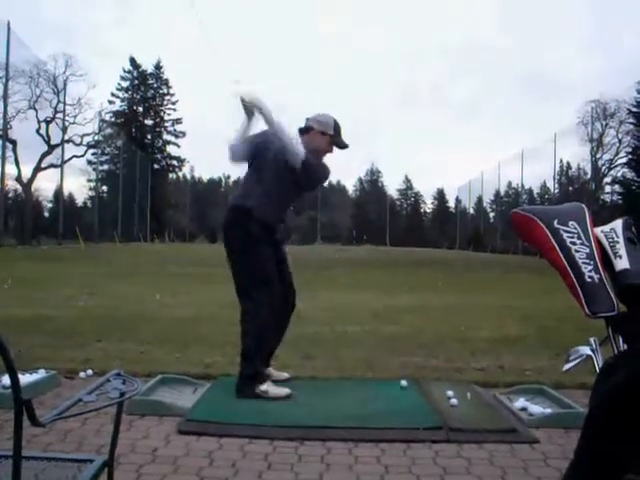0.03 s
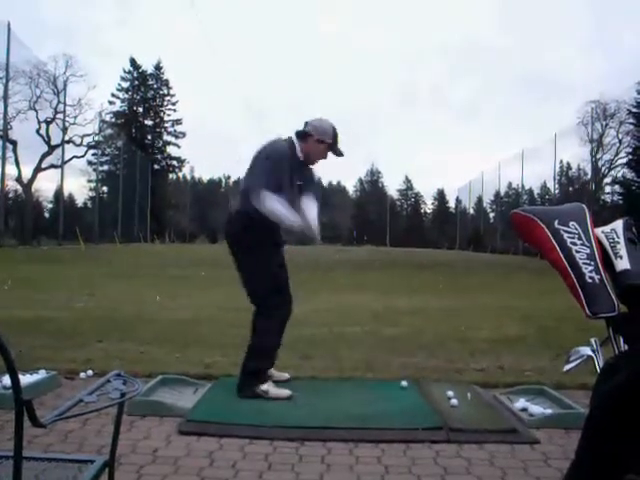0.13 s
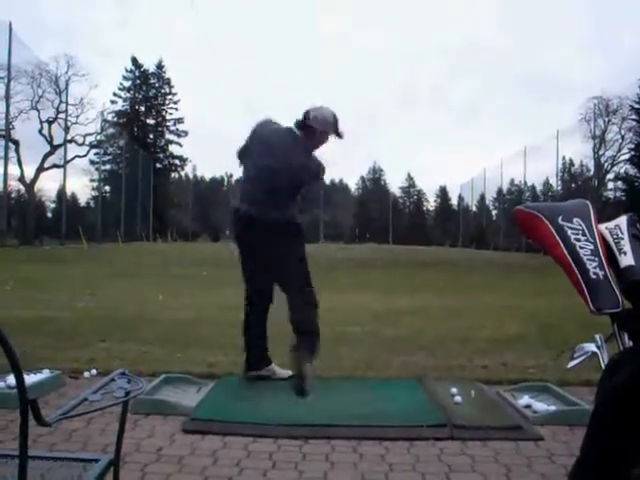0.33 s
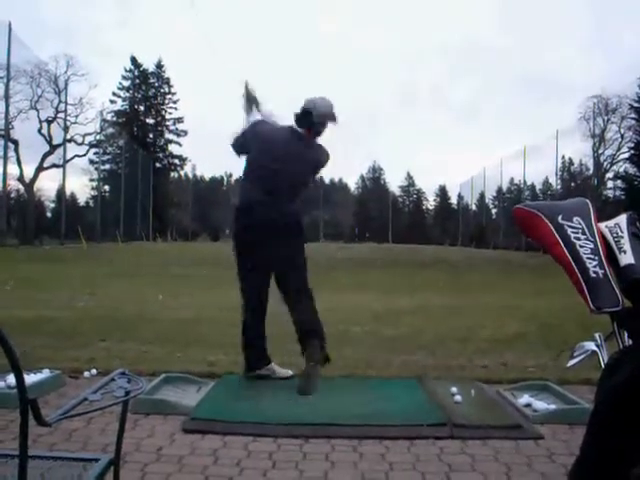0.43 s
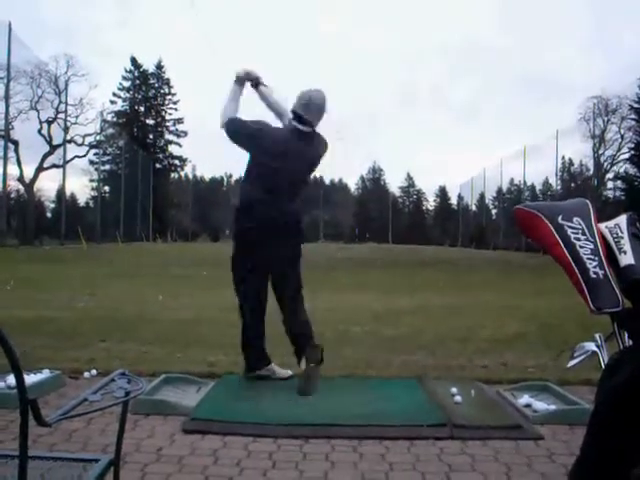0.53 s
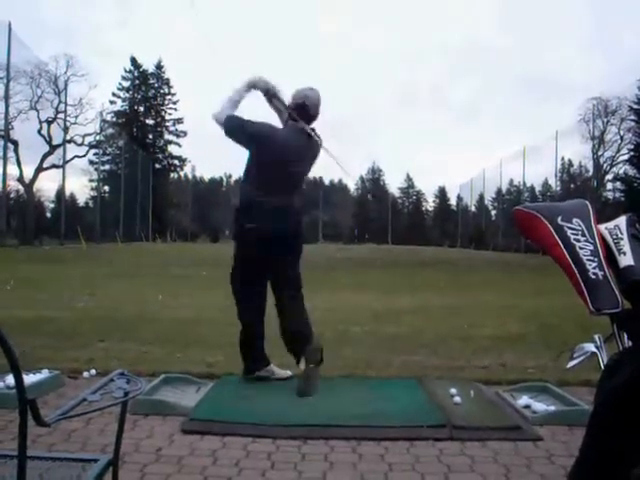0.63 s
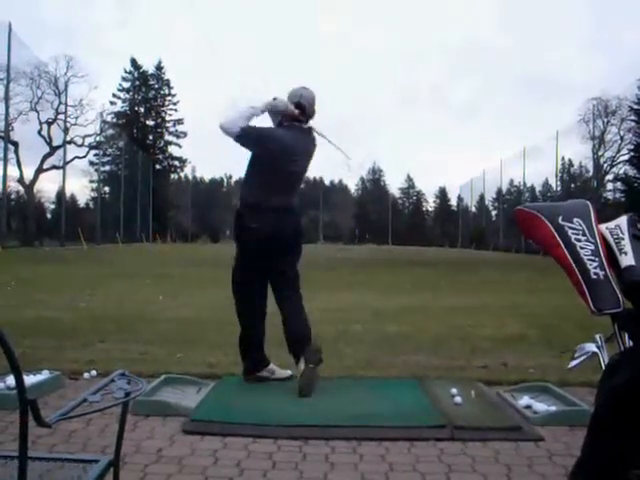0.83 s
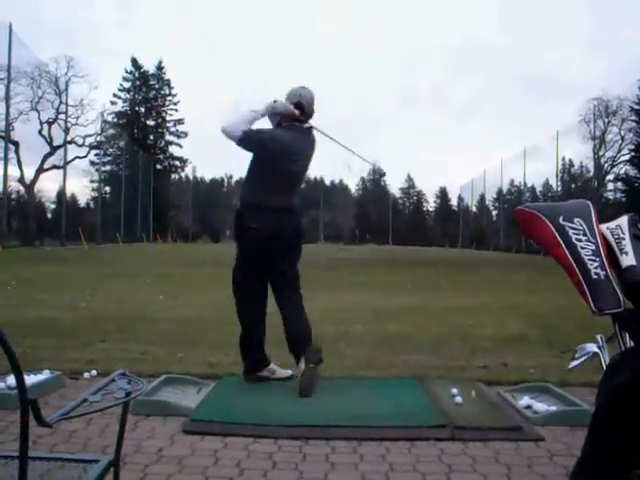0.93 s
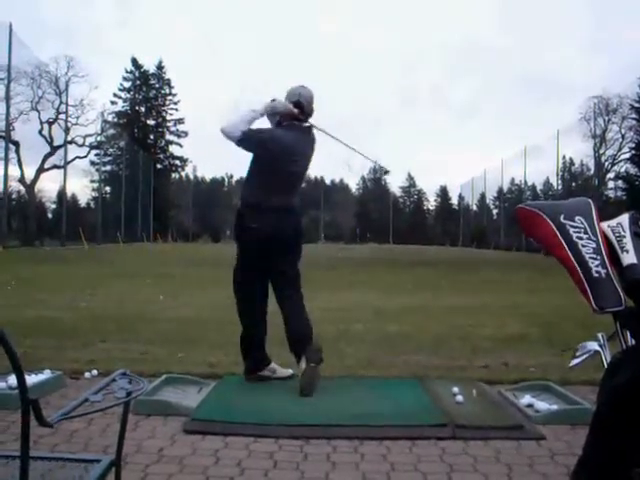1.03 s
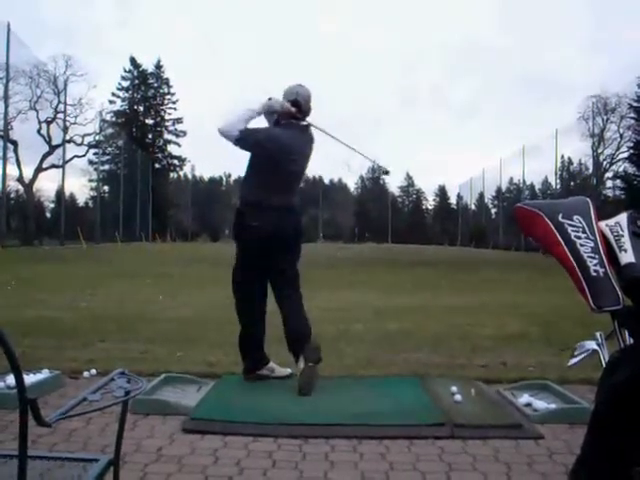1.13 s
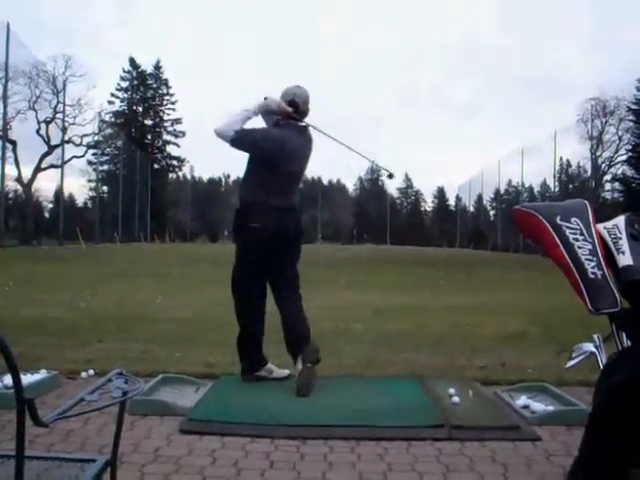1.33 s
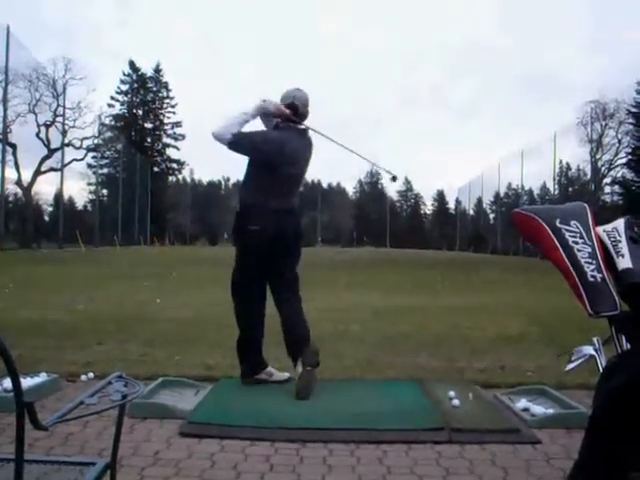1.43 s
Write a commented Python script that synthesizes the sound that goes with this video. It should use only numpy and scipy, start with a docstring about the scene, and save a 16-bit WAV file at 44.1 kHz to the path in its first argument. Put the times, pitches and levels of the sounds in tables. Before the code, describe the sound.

A golf club whistles down at about 0.2 seconds and strikes the ball at 0.25 with a loud, sharp crack that rings briefly and echoes away across the driving range. Soft dull knocks follow around 0.4 and 0.5 seconds. Near 1.3 seconds comes a faint swish, like a distant swing. Quiet outdoor air, low rumble, hiss and a very faint electronic whine continue throughout.

```python
"""A golf club drives a ball off a mat at a driving range. The shaft whistles down, the hollow head cracks
and rings briefly, and the bay throws the crack back. Soft knocks follow, then a faint swish like a swing
in another bay. Under it all: outdoor air, low rumble, hiss and a thin electronic whine."""
import sys
import numpy as np
from scipy import signal
from scipy.fft import rfft, irfft
from scipy.io import wavfile

SR = 44100
rng = np.random.default_rng(int(sys.argv[2]) if len(sys.argv) > 2 else 0)


def waveform_to_disk(signal):
    """Save audio, clipped to [-1, 1], as 16-bit WAV at the path in sys.argv[1]."""
    frames = np.transpose(np.atleast_2d(signal))
    scaled = np.clip(frames, -1, 1) * 32767
    samples = np.round(scaled).astype(np.int16)
    wavfile.write(sys.argv[1], SR, samples)


N = 66150
T = np.arange(N) / SR
IMPACT_S = .2496


def amp(db):
    """Decibels to gain."""
    return 10 ** (np.asarray(db) / 20)


def unit(x):
    """Scale to rms 1."""
    return x / np.sqrt(np.mean(abs(x) ** 2) + 1e-20)


def noise(spectrum):
    """Steady noise, rms 1, shaped by rows of freq_hz, relative density_db."""
    freq_hz, density_db = np.transpose(spectrum)
    bins_hz = np.fft.rfftfreq(N, 1 / SR)
    gain = amp(np.interp(np.log(bins_hz + 1), np.log(freq_hz), density_db))
    return unit(irfft(rfft(rng.standard_normal(N)) * gain, N))


def flutter(width_hz):
    """Slow complex noise, rms 1; spreads a tone into a band."""
    bins_hz = np.fft.fftfreq(N, 1 / SR)
    white = rng.standard_normal(N) + 1j * rng.standard_normal(N)
    return unit(np.fft.ifft(white / (1 + (2 * bins_hz / width_hz) ** 2)))


def tone(pitch_hz, envelope):
    """Steady or gliding tone under a complex envelope."""
    cycles = np.cumsum(pitch_hz * np.ones(N)) / SR
    return np.sqrt(2) * (envelope * np.exp(2j * np.pi * cycles)).real


def burst(start_s, rise_s, t60_s):
    """Envelope: quick rise, exponential decay."""
    age_s = np.maximum(T - start_s, 0)
    return (1 - np.exp(-age_s / rise_s)) * np.exp(-np.log(1000) * age_s / t60_s)


def swell(peak_s, width_s):
    """Gaussian envelope."""
    return np.exp(-((T - peak_s) / width_s) ** 2)


def outdoor_air(air_db=-64, rumble_db=-66):
    """Air swaying slightly in level, over low rumble."""
    # air and rumble spectra: freq_hz, density_db
    air_spectrum = [(30, -18.5), (200, -6), (400, -10.5), (700, -1.5), (1000, 0.5), (1400, -3.5),
                    (2200, -9), (3300, -23), (6000, -34), (16000, -55)]
    rumble_spectrum = [(15, -23), (30, -10.5), (60, -5.5), (88, -0.5), (130, -12), (220, -15), (400, -25),
                       (2000, -76.5)]
    sway_db = flutter(width_hz=8).real
    return amp(air_db + sway_db) * noise(air_spectrum) + amp(rumble_db) * noise(rumble_spectrum)


def downswing(rush_s=.233, rush_db=-42.5, rise_s=.032, fall_s=.03):
    """Vortices off the shaft whistle higher as it speeds up; the head adds a broad rush."""
    # shaft whistle: time_s, pitch_hz, level_db
    whistle_path = [(.13, 480, -82), (.175, 530, -66), (.2, 606.2, -44), (.222, 688, -46.5),
                    (.24, 688.4, -36), (.255, 639, -45.5), (.29, 538, -62), (.33, 453, -83)]
    # air torn by the head: freq_hz, density_db
    rush_spectrum = [(100, -23), (300, 2.5), (1100, -0.5), (1800, -3), (3300, -2), (6000, -13),
                     (10000, -17.5), (16000, -24)]
    time_s, pitch_hz, level_db = np.transpose(whistle_path)
    envelope = amp(np.interp(T, time_s, level_db)) * (T > time_s[0]) * (T < time_s[-1])
    whistle = envelope * tone(np.interp(T, time_s, pitch_hz), flutter(width_hz=150))
    rush = noise(rush_spectrum) * swell(rush_s, np.where(T < rush_s, rise_s, fall_s))
    return whistle + amp(rush_db) * rush


def strike(crack_db=.5, crack_hz=2600, width_s=.00022, thump_db=-27, thump_s=.001276,
           ring_db=3.5, ring_lag_s=.0001, scatter_db=-16):
    """Head meets ball: one sharp pressure swing, a low push, ringing modes, ground scatter."""
    # modes of head, ball and tee: freq_hz, relative_db, t60_s
    modes = [(396, -23, .032), (655, -16.5, .017), (1043, -21, .022), (1265, -17.5, .016),
             (1440, -28, 0.024), (1762, -25, .02), (2010, -33, .018), (2420, -14, 0.0066),
             (2680, -13, .009), (3417, -13, .01), (3860, -22.5, .018), (4346, -16, 0.018),
             (5000, -19.5, .011), (5460, -19, .013), (7150, -17, .009), (14900, -19.5, .008)]
    # dense scatter off mat and paving: freq_hz, density_db
    scatter_spectrum = [(60, -8), (130, 12), (260, -6.5), (900, -23), (2600, -4), (5500, 2.5), (6700, -4.5),
                        (9000, -9.5), (13500, -12.5), (16000, -13)]
    crack_s = IMPACT_S + width_s / 2
    crack = -amp(crack_db) * swell(crack_s, width_s) * np.sin(2 * np.pi * crack_hz * (T - crack_s))
    progress = np.maximum(T - IMPACT_S, 0) / thump_s
    thump = amp(thump_db) * (T > IMPACT_S) * (1 - progress) * np.exp(-progress)
    ring_s = IMPACT_S + ring_lag_s
    ring = sum(amp(db) * burst(ring_s, rise_s=.0005, t60_s=t60_s) * np.sin(2 * np.pi * hz * (T - ring_s))
               for hz, db, t60_s in modes)
    scatter = noise(scatter_spectrum) * burst(IMPACT_S - 2 * width_s, rise_s=.00027, t60_s=.017)
    return crack + thump - amp(ring_db) * ring + amp(scatter_db) * scatter


def bay_reflections(hit, tail_db=-33):
    """The bay returns the hit as single echoes and a short diffuse tail."""
    # reflections: delay_s, gain_db
    echo_taps = [(.0122, -33), (.0186, -32.5), (.0215, -36.5), (.0305, -46.5), (.0437, -35.5)]
    # diffuse tail: freq_hz, density_db
    tail_spectrum = [(100, -27.5), (250, -13), (390, 6), (550, -4.5), (1200, -3), (3000, -2), (6000, -19),
                     (10000, -16.5), (15000, -17.5), (16500, -25)]
    echoes = sum(amp(db) * np.pad(hit, (round(delay_s * SR), 0))[:N] for delay_s, db in echo_taps)
    tail = noise(tail_spectrum) * burst(IMPACT_S, rise_s=.0034, t60_s=.11)
    return echoes + amp(tail_db) * tail


def range_wash(near_db=-54.5, far_db=-56.5, rise_s=.02):
    """Long diffuse tail from the range, with blurred returns from further off."""
    # diffuse tail: freq_hz, density_db
    wash_spectrum = [(100, -16.5), (250, -4), (420, 2.5), (900, -2), (3200, -0.5), (5500, -10.5),
                     (10000, -23), (16000, -22.5)]
    # blurred returns: peak_s, level_db, width_s
    far_returns = [(0.347, -50.5, .011), (.579, -61, 0.014)]
    near = amp(near_db) * burst(IMPACT_S, rise_s, t60_s=.59)
    far = amp(far_db) * burst(IMPACT_S, rise_s, t60_s=1.86)
    return_power = sum((amp(db) * swell(peak_s, width_s)) ** 2 for peak_s, db, width_s in far_returns)
    return noise(wash_spectrum) * np.sqrt((near + far) ** 2 + return_power)


def knocks(width_hz=160, rise_s=.0018):
    """Short dull knocks as the golfer turns through."""
    # follow-through knocks: start_s, level_db, pitch_hz, t60_s
    knock_events = [(.407, -48.5, 209.2, 0.047), (0.41, -53, 480, 0.037), (.493, -54, 539, 0.039)]
    return sum(amp(db) * burst(start_s, rise_s, t60_s) * tone(hz, flutter(width_hz))
               for start_s, db, hz, t60_s in knock_events)


def distant_swish(level_db=-57, peak_hz=495, sag=.091, roughness=.6):
    """Soft whistle; pitch and level arch together."""
    arch = swell(peak_s=1.302, width_s=.0442)
    pitch_hz = peak_hz * (1 - sag * (1 - arch))
    return amp(level_db) * arch * tone(pitch_hz, unit(1 + roughness * flutter(width_hz=140)))


def scene():
    """Swing, hit and surrounding range, mono."""
    hit = strike()
    drive = downswing() + hit + bay_reflections(hit) + range_wash() + knocks()
    return (outdoor_air() + drive + distant_swish())[None]


def record(dry, hiss_db=-71.5, waver=.6, cutoff_hz=16400):
    """Electronics add a thin wavering whine and hiss, then limit the band."""
    # whine partials: freq_hz, level_db
    whine_partials = [(2543, -76), (5087, -83.5), (7631, -75), (8815, -72.5), (10174, -87), (11876, -88),
                      (13235, -75), (14422, -81)]
    # electronic hiss: freq_hz, density_db
    hiss_spectrum = [(100, 11), (2500, 1.5), (4000, -3), (7000, 0), (11000, -6.5), (15500, -2),
                     (16300, -26.5)]
    whine = sum(amp(db) * tone(hz, unit(1 + waver * flutter(width_hz=50))) for hz, db in whine_partials)
    hiss = amp(hiss_db) * noise(hiss_spectrum)
    lowpass_taps = signal.firwin(255, cutoff_hz, window=("kaiser", 8), fs=SR)
    return signal.oaconvolve(dry + whine + hiss, lowpass_taps[None], "same")


dry = scene()
out = record(dry)
waveform_to_disk(out)
```